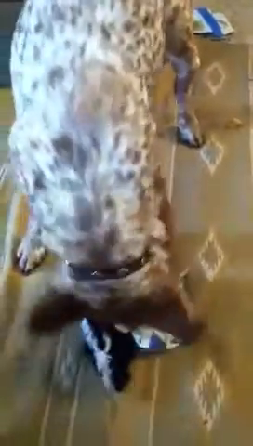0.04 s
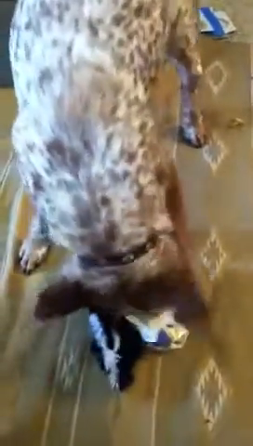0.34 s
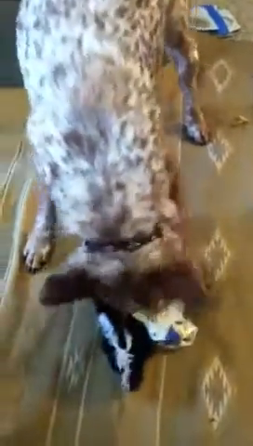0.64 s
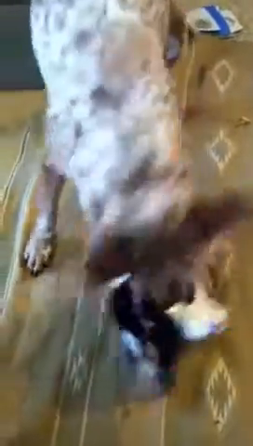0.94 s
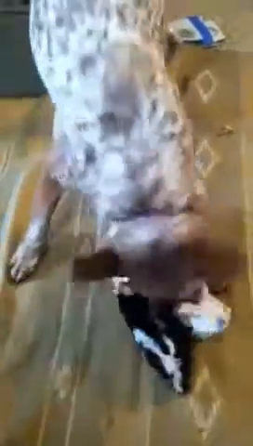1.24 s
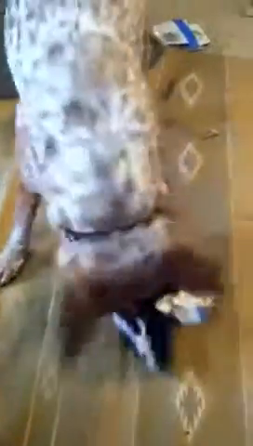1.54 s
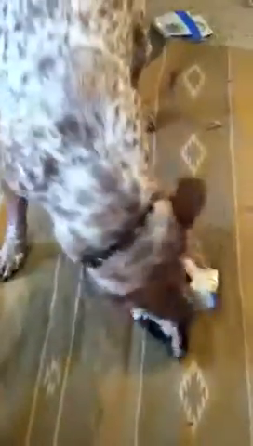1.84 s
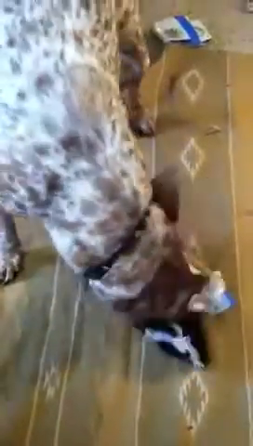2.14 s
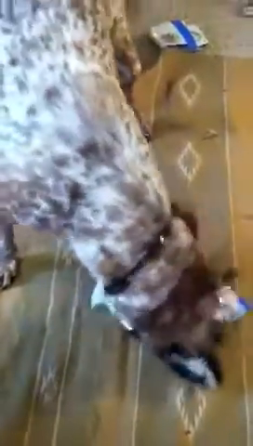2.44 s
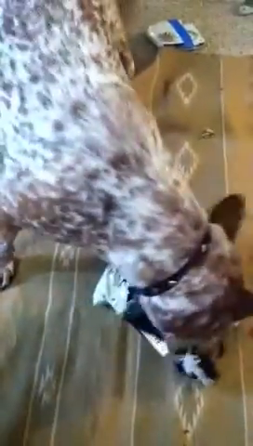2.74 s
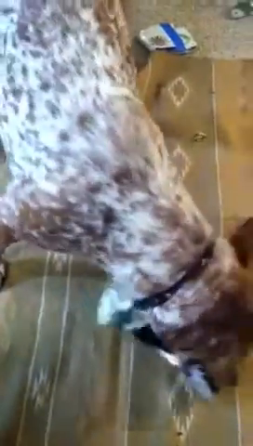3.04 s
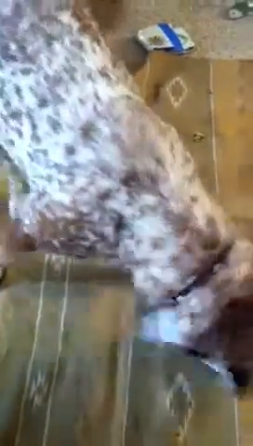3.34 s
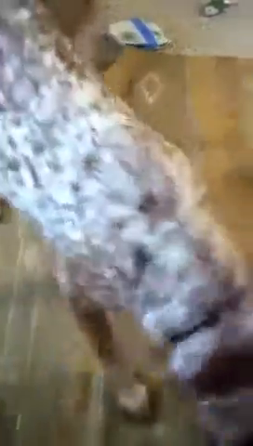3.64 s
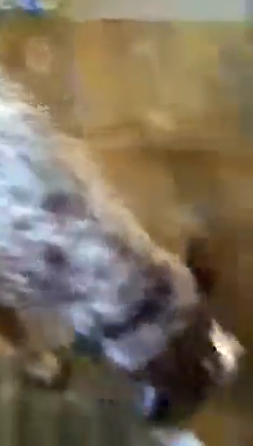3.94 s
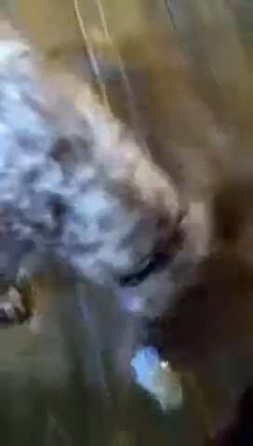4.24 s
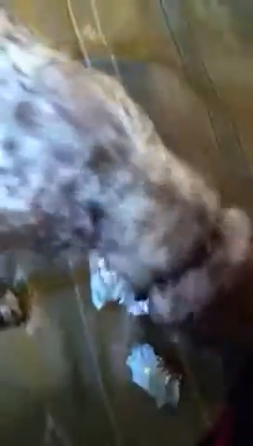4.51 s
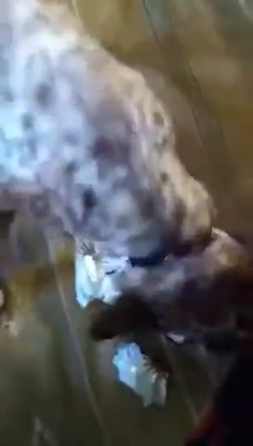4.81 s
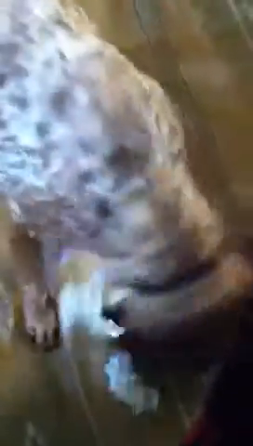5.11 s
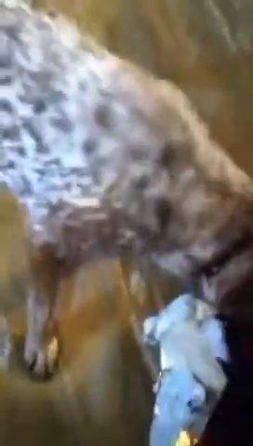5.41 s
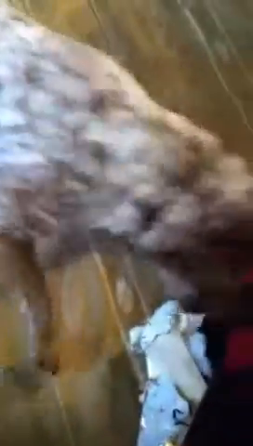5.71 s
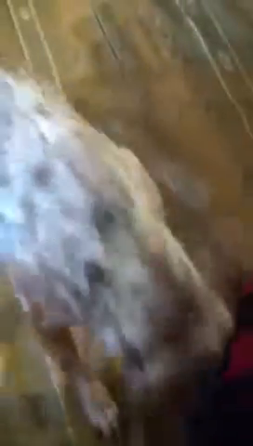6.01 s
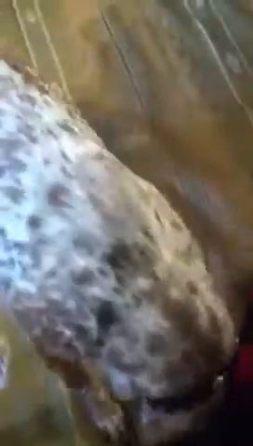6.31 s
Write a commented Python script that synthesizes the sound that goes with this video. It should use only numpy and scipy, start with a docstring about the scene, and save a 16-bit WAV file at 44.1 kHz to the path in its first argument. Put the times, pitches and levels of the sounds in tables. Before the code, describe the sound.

Clusters of high squeaks and whistling squeals come from plush toys as a dog bites them, its metal tags clinking.

```python
"""Two plush squeaky toys squeal as a dog chews and shakes them on a rug in a small room.
Each bite drives air through a plastic reed: a gentle squeeze makes it bleat, and a hard bite
flips it up to a whistle until the jaws ease. Metal tags jingle on the collar, fabric rustles,
jaws knock, teeth click and paws thump, all over a faint steady hiss."""
import sys
import numpy as np
from scipy import signal
from scipy.fft import rfft, irfft
from scipy.io import wavfile
from scipy.ndimage import uniform_filter1d

SR = 44100
rng = np.random.default_rng(int(sys.argv[2]) if len(sys.argv) > 2 else 0)


def waveform_to_disk(signal):
    """Save audio, clipped to [-1, 1], as 16-bit WAV at the path in sys.argv[1]."""
    frames = np.transpose(np.atleast_2d(signal))
    scaled = np.clip(frames, -1, 1) * 32767
    samples = np.round(scaled).astype(np.int16)
    wavfile.write(sys.argv[1], SR, samples)


N = 289294
TIME = np.arange(N) / SR
TOP_HZ = 16000


def amp(db):
    """Turns decibels into a gain."""
    return 10 ** (np.asarray(db) / 20)


def unit(x):
    """Scales a signal to an average (rms) size of 1."""
    return x / np.sqrt(np.mean(x ** 2) + 1e-20)


def look_up(points, hz):
    """Reads between the rows of a table, on a log-frequency scale."""
    f, value = np.transpose(points)
    return np.interp(np.log(hz + 1), np.log(f + 1), value)


def add(mix, start_s, sound):
    """Mixes a sound in at its start time."""
    part = mix[max(round(start_s * SR), 0):][:len(sound)]
    part += sound[:len(part)]


def colour(x, spectrum):
    """Gives a signal a colour (its balance of low and high), at size 1."""
    gain = amp(look_up(spectrum, np.fft.rfftfreq(len(x), 1 / SR)))
    return unit(irfft(rfft(x) * gain, len(x)))


def noise(spectrum, samples=N):
    """Steady noise of a given colour."""
    return colour(rng.standard_normal(samples), spectrum)


def wander(rate_hz):
    """Smooth random motion, up to about the given rate."""
    hz = np.fft.rfftfreq(N, 1 / SR)
    return unit(irfft(rfft(rng.standard_normal(N)) / (1 + (hz / rate_hz) ** 4), N))


def swells(rows):
    """Bell-shaped rises and falls in loudness."""
    return sum(amp(db) * np.exp(-((TIME - middle) / half) ** 2) for middle, db, half in rows)


def hits(rows, spectrum, gain_db, fade_s):
    """Short bursts of noise, coloured by what is hit."""
    out, t = np.zeros(N), TIME[:SR // 5]
    for start, db in rows:
        add(out, start, amp(db + gain_db) * rng.standard_normal(len(t)) * np.exp(-t / fade_s))
    shape = amp(look_up(spectrum, np.fft.rfftfreq(N, 1 / SR)))
    return irfft(rfft(out) * unit(shape), N)


# colour of the background: f/Hz, level/dB
HISS_COLOUR = [(30, -36), (70, -8), (215, 9.5), (499, 0), (2750, -5.5), (6720, -1.5), (8520, 3.5),
               (14000, -15.5), (16000, -61)]

def background_hiss():
    """A faint, steady hiss."""
    return amp(-60.5) * noise(HISS_COLOUR)


# how restlessly the dog shifts the plush: t/s, level/dB
FIDGET = [(0, -63.5), (0.9, -57), (1.5, -59.5), (2.0, -69), (2.2, -60.5), (2.7, -68), (3.1, -59.5),
          (3.6, -64), (3.85, -71), (4.3, -51.5), (4.7, -74), (5.3, -60), (5.85, -73), (6.1, -60.5),
          (6.35, -64.5), (6.56, -64)]
# plush dragged along: middle t/s, level/dB, half length/s
STROKES = [(0.16, -54.5, 0.11), (0.36, -53.5, 0.042), (0.502, -52, 0.052), (2.207, -65, 0.036),
           (4.155, -34, 0.019), (4.259, -45, 0.053), (6.052, -49.5, 0.038), (6.443, -51, 0.025),
           (6.529, -43, 0.024)]
# colours of the swish and the shuffle: f/Hz, level/dB
FABRIC_COLOUR = [(120, -45), (400, -0.5), (900, 11), (2000, 2), (4500, 3.5), (8000, -2.5), (12000, -12),
                 (16000, -29)]
SHUFFLE_COLOUR = [(25, -41), (90, -16), (150, -6.5), (230, 1), (350, -1), (700, -33), (2000, -54)]

def rustle(restless_db=5, snaps_per_s=480):
    """Plush rubs on fur and rug: a soft swish, snapping fibres and a dull shuffle."""
    fidget = amp(np.interp(TIME, *np.transpose(FIDGET)) + restless_db * wander(15.7))
    snaps = (rng.random(N) < snaps_per_s / SR) * rng.choice([-1, 1], N)
    snap_db = 2.5 * np.minimum(rng.exponential(1, N), 4)
    fibres = amp(-5.5) * colour(snaps * amp(snap_db), FABRIC_COLOUR)
    swish = noise(FABRIC_COLOUR) * amp(-4 + 4.7 * wander(41))
    shuffle = amp(-12) * noise(SHUFFLE_COLOUR)
    return (fidget + swells(STROKES)) * (swish + fibres + shuffle)


# jaws closing: t/s, level/dB
KNOCKS = [(0.128, -31), (0.146, -31), (0.504, -20), (0.641, -29), (0.718, -23), (0.755, -30.5),
          (1.139, -24.5), (3.081, -22), (3.976, -14.5), (4.879, -18.5)]
# colour of a knock: f/Hz, level/dB
KNOCK_COLOUR = [(200, -22), (500, -5), (900, 3), (1600, -10), (4000, -10.5), (15000, -42)]

def jaw_knocks():
    """Jaws close on the plush with a dull knock."""
    return hits(KNOCKS, KNOCK_COLOUR, gain_db=-5, fade_s=.0029)


def bleat(start, length, rise, first_hz, top_hz, last_hz, sag, db, mouth_hz, boost_db, overtones_db):
    """One gentle squeeze for the reed: pressure builds and sags, and pitch and loudness follow."""
    t = np.arange(0, length, 1 / SR)
    building = 1 - np.sin(np.pi / 2 * np.minimum(t / rise, 1))
    spent = np.clip((t - rise) / (length - rise), 0, 1)
    hz = top_hz + (first_hz - top_hz) * building + (last_hz - top_hz) * spent ** sag
    blow_db = db + 1.5 * np.log2(hz / top_hz) - .5 * building - 5.5 * spent ** (5 * sag)
    attack_s = max(.0028, .14 * rise)  # a slow squeeze gets the reed going later
    return start, attack_s, hz, blow_db, mouth_hz, boost_db, overtones_db


# colour of the air hissing through the reed's slit: f/Hz, level/dB
SLIT_COLOUR = [(300, -22.5), (1200, -1.5), (4000, -12), (8000, 11), (11000, 0), (16000, -23)]

def reed(squeezes, body, *, jitter, waver, shimmer, flutter_db, air_db, full_blow_db, mellow, smear_s,
         mouth_width_hz, treble_db_per_octave, uneven_db, hollow_db):
    """A reed chops air into uneven pulses; the squeaker's body weights and delays their overtones."""
    out, air, rush = np.zeros(N), noise(SLIT_COLOUR), swells(RUSHES)
    wobble, rasp, flutter = wander(730), wander(520), wander(60)
    harmonic = np.arange(1, 21)[:, None]
    is_overtone = harmonic > 1
    for start, attack_s, pitch, blow_db, mouth_hz, boost_db, overtones_db in squeezes:
        t = TIME[:len(pitch)]
        span = round(start * SR) + np.arange(len(t))
        # above about 2540 Hz the tube steadies the reed; rushing air shakes it
        loose = 1 / np.hypot(1, pitch / 2540)
        rattle = loose * (1 + 4 * np.minimum(rush[span] / amp(blow_db), 1))
        bend = jitter * rattle * wobble[span] + waver * loose * flutter[span]
        hz = np.exp(uniform_filter1d(np.log(pitch), size=90) + bend)
        phase = 2 * np.pi * np.cumsum(hz) / SR
        harmonic_hz = harmonic * hz
        # a weakly blown reed no longer slaps shut, so its overtones fade
        weak_db = np.minimum(blow_db - full_blow_db, 0)
        soft_db = (overtones_db + mellow * weak_db) * is_overtone
        # the dog's mouth boosts one band, favours chance overtones, dulls the top and dips below the band
        mouth_db = boost_db * np.exp(-((harmonic_hz - mouth_hz) / mouth_width_hz) ** 2)
        mouth_db += uneven_db * rng.standard_normal(harmonic.shape) * is_overtone
        mouth_db += treble_db_per_octave * np.maximum(np.log2(harmonic_hz / mouth_hz), 0)
        mouth_db += hollow_db * np.exp(-((harmonic_hz - .75 * mouth_hz) / 800) ** 2)
        weight = amp(look_up(body, harmonic_hz) + mouth_db + soft_db) * (harmonic_hz < TOP_HZ)
        # high overtones leave the tube later, which smears each pulse
        lag = np.pi * smear_s * harmonic_hz ** 2 / TOP_HZ
        tone = (weight * np.cos(harmonic * phase - lag)).sum(0) / np.sqrt((weight ** 2).sum(0) / 2)
        # no two slaps are equally strong
        tone *= (1 + shimmer * rattle * rasp[span]) / np.hypot(1, shimmer * rattle)
        # air hisses whenever the reed opens, and stands out more in a weak squeeze
        hiss = amp(air_db - .5 * weak_db) * air[span] * (1 + .5 * np.cos(phase))
        fades = np.clip(t / attack_s, 0, 1) * np.clip((t[-1] - t) / .0022, 0, 1)
        add(out, start, amp(blow_db + flutter_db * flutter[span]) * fades * (tone + hiss))
    return out


# gentle squeezes and refills: t/s, length/s, rise/s, first f/Hz, top f/Hz, last f/Hz,
# sag (under 1 drops early), level/dB, mouth f/Hz, mouth boost/dB, overtones/dB
SMALL_BLEATS = [ (.194, 0.078, 0.028, 1250, 1974, 1106, 0.67, -39, 7140, 11.5, 5.5),
                (.304, 0.082, 0.041, 1382, 1480, 1300, 1.46, -42, 4750, -1, 12),
                (.628, 0.11, 0.0077, 1637, 1771, 1269, 1.82, -39.5, 8200, -14, 6),
                (.823, 0.014, 0.014, 1360, 2470, 2263, 1, -37.5, 5500, 1, 10.5),
                (1.043, 0.1, 0.06, 1270, 2281, 1266, 1.2, -30.5, 9670, 7.5, 3),
                (1.21, 0.045, 0.038, 1200, 2053, 1620, 1.2, -41.5, 8550, 8, 7.5),
                (1.374, 0.11, .015, 1630, 1896, 1413, 0.98, -28, 9570, 14, -0.5)]
# hard bites and releases: start t/s, flip t/s, end t/s, glide/s, from f/Hz, to f/Hz,
# level/dB, change at the whistling end/dB, mouth f/Hz, mouth boost/dB
SMALL_SWOOPS = [ (0.926, 0.9333, .938, 0.0025, 4880, 1470, -33.5, 0, 6700, 21.5),
                (1.294, 1.3, 1.31, 0.0035, 5740, 2850, -28.5, -7, 6760, 14)]
# colour of the squeaker through its plush: f/Hz, level/dB
SMALL_BODY = [(200, -30), (900, 18), (1600, 5), (3000, -3), (4700, -7), (6800, -11), (9200, -9),
              (11000, -8), (14500, -10)]

def small_toy():
    """The small toy's reed squeaks high and raspy."""
    squeezes = [bleat(*row) for row in SMALL_BLEATS] + [swoop(*row) for row in SMALL_SWOOPS]
    return amp(-1.5) * reed(
        squeezes, SMALL_BODY, jitter=.013, waver=.026, shimmer=.26, flutter_db=.5,
        air_db=-16, full_blow_db=-54.5, mellow=.16, smear_s=.00082,
        mouth_width_hz=4440, treble_db_per_octave=-35.5, uneven_db=.5, hollow_db=-7.5)


# teeth and claws striking: t/s, level/dB
TICKS = [(0.45, -31), (0.505, -29.5), (0.604, -23.5), (1.988, -35), (5.463, -24.5), (6.061, -27.5),
         (6.082, -24), (6.25, -29), (6.409, -31.5)]
# colour of a tick: f/Hz, level/dB
TICK_COLOUR = [(200, -10), (1000, 0), (4200, 0), (15000, -21)]

def tooth_ticks():
    """Hard teeth and claws make tiny, bright clicks."""
    return hits(TICKS, TICK_COLOUR, gain_db=-6, fade_s=.0013)


# landings on the rug: t/s, level/dB
THUMPS = [(0.452, -42), (0.502, -42), (2.256, -44), (3.078, -43), (3.655, -45), (3.976, -30), (4.135, -47),
          (4.246, -40), (4.876, -39), (5.375, -38), (6.359, -48), (6.504, -44)]
# colour of a thump: f/Hz, level/dB
THUMP_COLOUR = [(25, -26), (90, -27), (150, -5), (240, 3), (380, -4), (700, -14.5), (2000, -31)]

def rug_thumps():
    """Paws and toy hit the rug with a low thud."""
    return hits(THUMPS, THUMP_COLOUR, gain_db=3, fade_s=.006)


def tag(notes, t, bounce_size, bounces_per_s, bounce_fade_s):
    """A struck tag bounces and rings; each strike lands elsewhere and mixes its notes differently."""
    bounces = bounce_size * (rng.random(len(t)) < bounces_per_s / SR)
    bounces *= rng.standard_normal(len(t)) * np.exp(-t / bounce_fade_s)
    bounces[0] = 1  # the strike itself
    hz, db, ring_s = np.transpose(notes)[:, :, None]
    size = amp(db + 3 * rng.standard_normal(hz.shape))
    hz = hz * (1 + .006 * rng.standard_normal(hz.shape))
    waves = np.sin(2 * np.pi * (hz * t + rng.random(hz.shape))) * amp(-60 * t / ring_s)
    ring = (size * waves).sum(0) / np.linalg.norm(size)
    muffle = .16 + .84 * np.exp(-t / .004)  # the tags damp each other
    return signal.fftconvolve(bounces, ring * muffle)[:len(t)]


# tags meeting: t/s, large tag level/dB, small tag level/dB
CLINKS = [(0.738, -27.5, -55), (1.002, -51, -36.5), (1.613, -41, -33.5), (1.623, -41, -33),
          (1.797, -39, -49), (1.809, -48, -39.5), (1.8292, -36, -43), (1.932, -32, -58), (2.0772, -26, -43),
          (2.2687, -31.5, -51.5), (2.3065, -24.5, -44), (2.389, -38, -50), (2.453, -31, -62),
          (2.481, -30, -64), (2.4887, -23.5, -57), (2.5005, -22, -64), (2.515, -30, -57),
          (2.5696, -23.5, -64), (2.6114, -24.5, -40.5), (3.1138, -31, -57), (3.3284, -26, -48),
          (3.604, -28, -39), (3.6371, -24, -49), (3.7123, -30.5, -42.5), (3.9297, -29.5, -44),
          (4.468, -25.5, -59), (4.5507, -32, -41), (5.534, -32, -41.5), (5.7451, -24.5, -33.5),
          (5.7812, -45, -38.5), (5.9266, -39, -45), (6.177, -30, -32.5)]
# notes of each freely ringing tag: f/Hz, level/dB, time to fade by 60 dB/s
LARGE_TAG = [(5630, -12.5, 0.058), (6150, -8, 0.049), (8436, 0.5, 0.072), (8390, 9.5, 0.13),
             (13600, -15, 0.092), (14200, -13, 0.1)]
SMALL_TAG = [(4818, -3.5, .15), (5507, -9, .12), (7440, -4, .12), (8398, -6, .12), (8861, -6, .18),
             (9771, -13, .12), (10830, -1, .14), (11370, 0, .15), (13640, -13, .15), (14560, -14, .14)]

def collar():
    """Two metal tags strike each other and ring briefly; the light one chatters."""
    out, t = np.zeros(N), TIME[:SR // 3]
    # metal touching metal: f/Hz, level/dB
    contact_colour = [(300, -40), (1500, -9), (3500, -1), (5200, 2), (10000, 12.5), (15000, -22)]
    onset = 1 - np.exp(-t / .00036)
    for start, large_db, small_db in CLINKS:
        small = tag(SMALL_TAG, t, bounce_size=.5, bounces_per_s=250, bounce_fade_s=.025)
        large = tag(LARGE_TAG, t, bounce_size=.4, bounces_per_s=120, bounce_fade_s=.02)
        ringing = amp(large_db - .5) * large + amp(small_db + 5.5) * small
        tick = amp(large_db - 9.5) * np.exp(-t / .00098)
        chatter = amp(small_db - 8.5) * np.exp(-t / .034)
        add(out, start, ringing * onset + (tick + chatter) * noise(contact_colour, len(t)))
    return out


def swoop(start, flip, end, glide, from_hz, to_hz, db, whistle_db, mouth_hz, boost_db):
    """A hard bite flips the reed up to a whistle, or easing jaws let it fall, along an S-curve."""
    t = np.arange(start, end, 1 / SR) - flip
    hz = from_hz * (to_hz / from_hz) ** (.5 + .5 * t / np.hypot(t, glide))
    from_flip = np.where(t < 0, t / (start - flip), t / (end - flip))
    whistling = t * (to_hz - from_hz) > 0
    blow_db = db + np.where(whistling, whistle_db, -7.5) * from_flip ** 2
    attack_s, overtones_db = .0029, 0
    return start, attack_s, hz, blow_db, mouth_hz, boost_db, overtones_db


def low_tone(middle_s=1.795, half_s=.025, db=-54.5, hz=228, hz_per_s=930):
    """A faint low tone rises briefly as the dog lowers its head."""
    t = TIME - middle_s
    phase = 2 * np.pi * (hz + hz_per_s * t / 2) * t
    return swells([(middle_s, db, half_s)]) * np.sqrt(2) * np.sin(phase)


# the large toy's squeezes, bites and colour, with the same columns as the small toy's
LARGE_BLEATS = [ (3.058, 0.02, 0.0035, 990, 1034, 1017, 0.87, -22, 7800, 4.9, -2.5),
                (3.08, 0.013, 0.002, 1490, 1895, 993, 0.98, -21, 6900, 2.8, 5),
                (3.216, 0.087, 0.025, 765, 848, 783, 1.24, -26, 8150, 7.7, 1.5),
                (3.37, 0.072, 0.019, 1031, 1144, 890, 0.53, -21, 6730, 11.9, 5),
                (3.504, 0.076, 0.015, 803, 875, 682, 1.67, -27.5, 8800, 1, 5),
                (4.085, 0.063, 0.014, 870, 1335, 766, 0.41, -23.5, 8500, 8.9, -4),
                (4.34, 0.084, 0.021, 903, 1241, 701, 1.04, -26, 7850, 6, 2),
                (4.837, 0.051, 0.018, 1050, 1182, 1017, 0.71, -20.5, 7500, 16.3, -1),
                (4.877, 0.024, 0.0056, 1570, 2886, 1535, 1.6, -20, 7700, 4, -6),
                (4.995, .054, 0.012, 782, 1188, 760, 0.27, -26, 7660, 1.7, -0.5),
                (5.243, 0.043, 0.012, 810, 797, 698, 0.9, -38, 7900, 7.9, 5),
                (5.288, 0.12, 0.029, 712, 824, 760, 0.69, -34.5, 8100, 10, 1),
                (5.372, 0.042, 0.01, 833, 1485, 1008, 1.67, -24.5, 7140, 11, 8),
                (5.445, 0.051, 0.028, 763, 831, 765, 1, -32, 8250, 14, -9)]
LARGE_SWOOPS = [ (2.75, 2.7685, 2.79, 0.0071, 1011, 4860, -15, 0.5, 6300, 10.5),
                (2.879, 2.8863, 2.89, 0.0023, 4820, 738, -16, 4.5, 5870, 15.5),
                (2.905, 2.9203, 2.926, 0.0039, 816, 4110, -22.5, 0, 7640, 0.5),
                (2.989, 3.016, 3.03, 0.0069, 3750, 670, -25, -28, 8500, 1.5),
                (3.974, 3.9768, 4.028, 0.0047, 890, 4580, -17, -8, 7600, 2),
                (4.051, 4.0677, 4.073, 0.0046, 4750, 705, -17.5, -1, 7460, 10),
                (4.174, 4.1894, 4.205, 0.00493, 1107, 4780, -16, 2.5, 6800, 3),
                (4.287, 4.301, 4.306, 0.0042, 4615, 897, -23.5, 17, 7240, 0.5),
                (5.059, 5.072, 5.105, 0.0046, 954, 4770, -20.5, -15, 7840, 5.5),
                (5.105, 5.143, 5.148, 0.0038, 4687, 685, -19.5, -8, 6900, 10)]
LARGE_BODY = [(150, -28), (500, -34), (740, 2.5), (1150, -1.5), (1900, 4), (3200, -6), (4400, -1),
              (5400, -8), (6500, -7.5), (7800, -5), (9300, -7.5), (11000, -18.5), (15000, -31)]

def large_toy():
    """The large toy's reed squeaks lower, louder and clearer."""
    squeezes = [bleat(*row) for row in LARGE_BLEATS] + [swoop(*row) for row in LARGE_SWOOPS]
    return amp(-2) * reed(
        squeezes, LARGE_BODY, jitter=.012, waver=.013, shimmer=.14, flutter_db=1,
        air_db=-19.5, full_blow_db=-19, mellow=.54, smear_s=.00076,
        mouth_width_hz=2200, treble_db_per_octave=-19.5, uneven_db=3.5, hollow_db=-3)


# puffs of air: middle t/s, level/dB, half length/s
RUSHES = [(3.082, -30, 0.0087), (3.44, -47, 0.041), (3.982, -23, 0.0044), (4.073, -32, 0.003),
          (4.11, -47, 0.024), (4.375, -40.5, 0.024), (4.904, -26, 0.032), (5.072, -29.5, 0.016),
          (5.397, -32, 0.024), (5.465, -50.5, 0.076)]
# colour of a puff: f/Hz, level/dB
RUSH_COLOUR = [(200, -46), (900, -0.5), (2200, 0), (4500, -2), (7800, 3), (11000, -15.5), (16000, -30)]

def air_rush():
    """Air rushes past the reed when the jaws pinch it."""
    return swells(RUSHES) * noise(RUSH_COLOUR)


def thin_whistle(start_s=4.201, length_s=.084, low_hz=8400, top_hz=11000):
    """The hardest bite overblows the large reed into a thin, pure note that rises and falls."""
    progress = np.clip((TIME - start_s) / length_s, 0, 1)
    hz = low_hz + (top_hz - low_hz) * np.sin(np.pi * progress)
    loudness = 2 * amp(-37) * uniform_filter1d(np.sqrt(progress) * (progress < 1), size=200)
    return loudness * np.sin(2 * np.pi * np.cumsum(hz) / SR)


# how long the room rings: f/Hz, time to fade by 60 dB/s
ROOM_RING = [(200, 0.26), (1000, 0.26), (15000, 0.32)]

def room(x, early_db, tail_db, early_fade_s, first_echo_s):
    """Floor and furniture echo within milliseconds; the walls leave a short tail."""
    t = TIME[:SR // 2]
    echoes_per_s = np.array([[900], [4000]])  # early, late
    signs = rng.choice([-1., 1.], (2, len(t)))
    early, late = signs * (rng.random(signs.shape) < echoes_per_s / SR)
    early *= (t > first_echo_s) * np.exp(-t / early_fade_s)
    hz, age, bands = signal.stft(late * (t > .012), SR, nperseg=256)
    fade = amp(-60 * age / look_up(ROOM_RING, hz)[:, None])
    tail = signal.istft(bands * fade, SR, nperseg=256)[1][:len(t)]
    echo = amp(early_db) * early / np.linalg.norm(early) + amp(tail_db) * tail / np.linalg.norm(tail)
    return x + signal.fftconvolve(x, echo)[:N]


def scene():
    """The toys, the collar and the dog's movements in one room."""
    small = small_toy()
    large = large_toy() + air_rush() + thin_whistle()
    dog = collar() + jaw_knocks() + rug_thumps() + tooth_ticks() + rustle() + low_tone()
    mix = room(small, early_db=-1, tail_db=-5, early_fade_s=.0085, first_echo_s=.0015)
    mix += room(large, early_db=-9, tail_db=-11.5, early_fade_s=.015, first_echo_s=.006)
    mix += room(dog, early_db=-7, tail_db=-10.5, early_fade_s=.017, first_echo_s=.0015)
    return (mix + background_hiss())[None]


def record(dry):
    """Cuts away the very highest treble."""
    low_pass = signal.firwin(511, TOP_HZ, window=("kaiser", 9), fs=SR)
    return signal.oaconvolve(dry, low_pass[None], "same")


dry = scene()
out = record(dry)
waveform_to_disk(out)
```